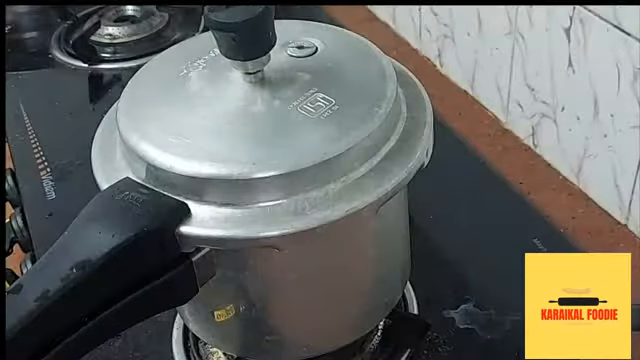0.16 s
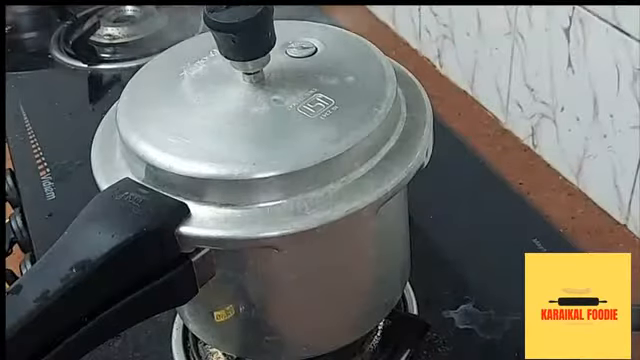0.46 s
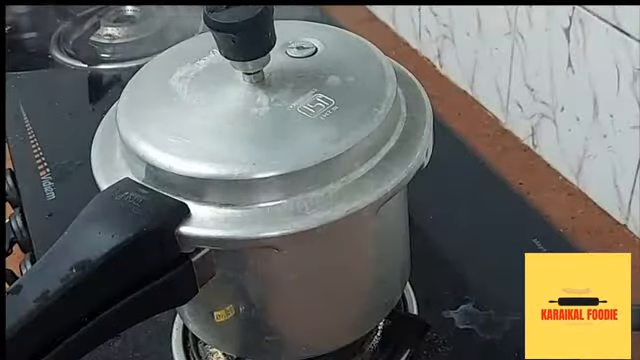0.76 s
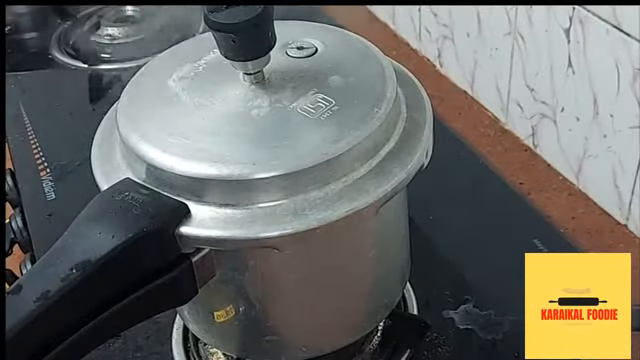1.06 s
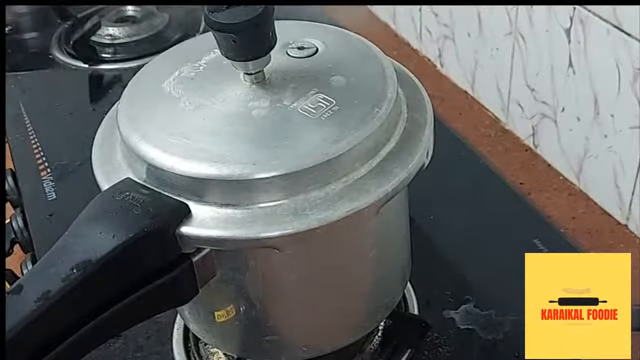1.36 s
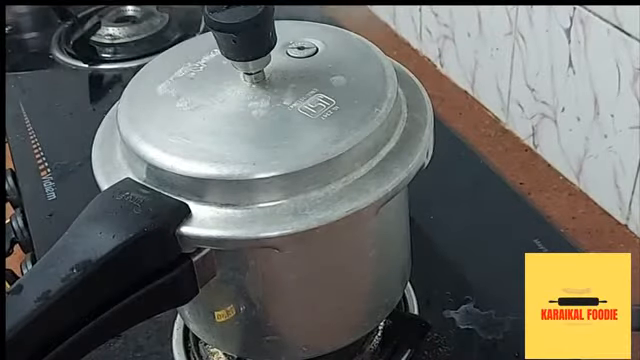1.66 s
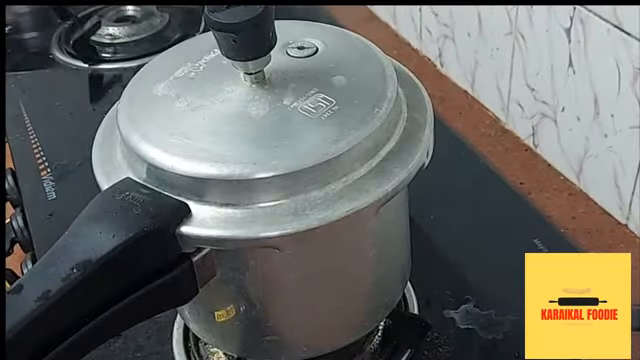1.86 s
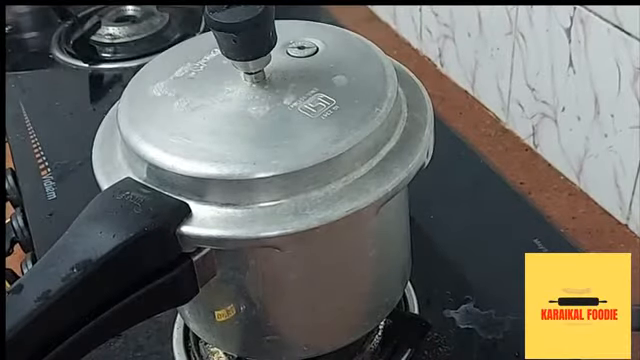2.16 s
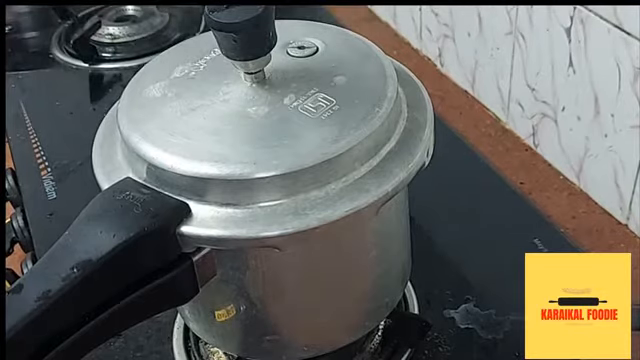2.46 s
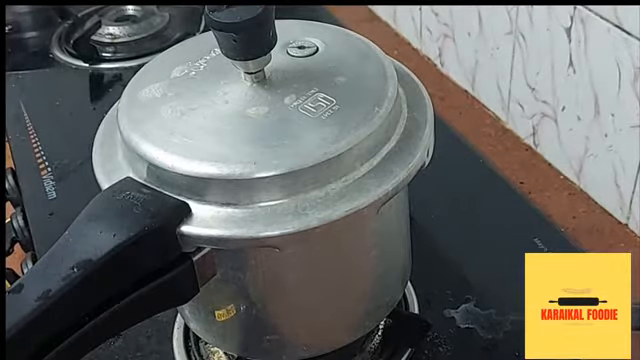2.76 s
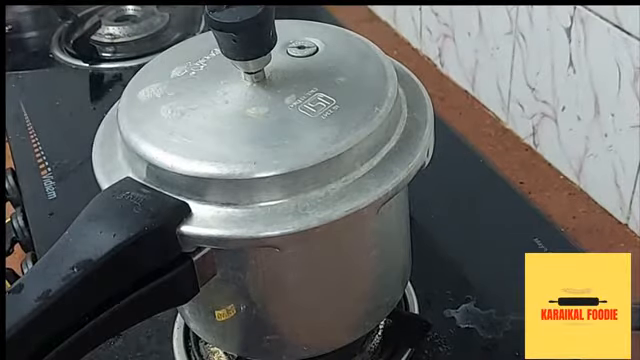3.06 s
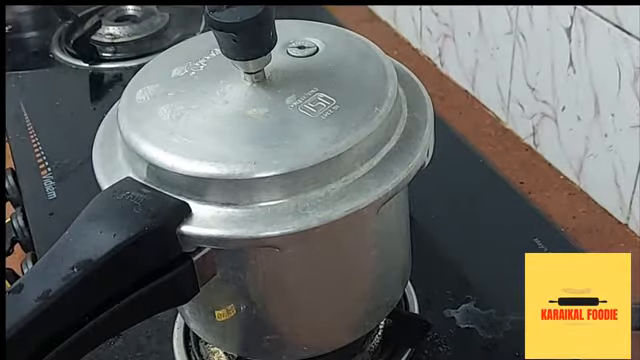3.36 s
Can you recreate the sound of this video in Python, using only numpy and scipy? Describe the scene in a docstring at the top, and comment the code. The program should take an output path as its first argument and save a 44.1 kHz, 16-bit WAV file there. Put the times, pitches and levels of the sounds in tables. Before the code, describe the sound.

A pressure cooker vents steam: a faint hum, a sudden burst within 0.2 seconds, then a loud continuous hiss to the end, with early rumbling thumps on the right, recorded close in a tiled kitchen.

```python
"""A faint appliance hum, from summed sines, fades in the first 0.2 s as steam bursts from a pressure cooker.
Three turbulent jets hiss through the resonant cavity under the weight, in a tiled kitchen, to the end.
Their draught buffets two microphone ports with a lumpy rumble and random pressure steps;
between 0.22 and 0.82 s sharp pressure jumps strike the right port alone.
Filtered impulses make a patter of droplets that weakens by 2 s, and a few larger spits from 1 s on."""
import sys
import numpy as np
from scipy import signal
from scipy.fft import rfft, irfft
from scipy.io import wavfile
from scipy.ndimage import uniform_filter1d

SR = 44100
rng = np.random.default_rng(int(sys.argv[2]) if len(sys.argv) > 2 else 0)


def pcm_store(signal):
    """Save signal as 16-bit PCM."""
    levels = np.round(np.clip(np.atleast_2d(signal), -1, 1) * 32767)
    wavfile.write(sys.argv[1], SR, levels.astype(np.int16).T)


N = 154350
T = np.arange(N) / SR

# Course of the steam. Each row: time in seconds, hiss level in dB, extra level of the low mids in dB,
# extra level of the treble in dB.
STEAM_COURSE = [(0, -38, 8, -19), (0.026, -40.5, 10, 0), (.031, -36, 12, -15), (.05, -24, -3, -13),
                (.068, -32.5, 13, 2), (.082, -24.5, 17, -7), (.13, -16, 8.5, -4.5), (.17, -14, 9, -2),
                (.2, -13, -10, -11.5), (0.262, -18.5, 3, -1), (.46, -20, -1.5, -2), (.54, -18.5, 0, -4),
                (.92, -18.5, -4.5, -3), (.935, -21.5, -1.5, -4), (1.15, -21.5, 0, -3.5),
                (1.66, -22.5, -2, -3), (1.85, -23.5, 0, -3), (2.22, -21, -1, -2.5), (2.5, -20, -3, -4.5),
                (2.8, -21, -0.5, -2.5), (3.3, -20, -1.5, -3), (3.5, -20, -3.5, -6.5)]
COURSE_S, HISS_DB, LOW_MID_DB, TREBLE_DB = np.transpose(STEAM_COURSE)


def gain_of(db):
    """Amplitude ratio from decibels: 20 dB is a factor of ten."""
    return 10 ** (np.asarray(db) / 20)


def evened(x):
    """Normalises to unit root-mean-square over all channels together."""
    return x / np.sqrt(np.mean(x ** 2) + 1e-20)


def read_spectrum(points, hz):
    """Interpolates a dB spectrum linearly over logarithmic frequency."""
    f, db = np.transpose(points)
    return np.interp(np.log(hz + 1), np.log(f + 1), db)


def filtered(x, hz, kind, order=2):
    """Butterworth filter: a maximally flat passband."""
    return signal.sosfilt(signal.butter(order, hz, kind, fs=SR, output="sos"), x)


def coloured(x, db):
    """Zero-phase filter: multiplies the Fourier spectrum by a gain in dB given as a function of Hz."""
    hz = np.fft.rfftfreq(x.shape[-1], 1 / SR)
    return irfft(rfft(x) * gain_of(db(hz)), x.shape[-1])


def random_impulses(per_s, spread_db, most):
    """Poisson impulses of random sign; their dB sizes are exponential, capped at `most` spreads."""
    size = gain_of(spread_db * np.minimum(rng.exponential(1, (2, N)), most))
    sign = rng.choice([-1., 1.], (2, N))
    return size * sign * (rng.random((2, N)) < per_s / SR)


def background():
    """Steady tones of an appliance superposed on shaped room noise, both under one fade."""
    # Appliance tones. Each row: frequency in Hz, RMS level in dB.
    tones = [(113.0, -46), (199.2, -39.5)]
    # Room noise spectrum. Each row: frequency in Hz, relative level in dB.
    room_spectrum = [(30, -10), (60, 0), (200, 13), (400, -16), (1700, -32), (7800, -30), (15700, -40)]
    hum = sum(np.sqrt(2) * gain_of(db) * np.sin(2 * np.pi * (hz * T + rng.random())) for hz, db in tones)
    noise = coloured(rng.standard_normal((2, N)), lambda hz: read_spectrum(room_spectrum, hz))
    fade = gain_of(np.interp(T, [.11, .17], [0, -20]))  # seconds, dB
    return fade * (hum + gain_of(-46) * evened(noise))


def droplet_tick(x):
    """A droplet as a band-limited impulse: its short pressure pulse loses both treble and bass."""
    return filtered(filtered(x, 1365, "low"), 343.2, "high", order=3)


def spatter():
    """Shot noise: many random ticks merge into a patter under the hiss; larger ones stand alone."""
    # Large spits at the right port. Each row: time in seconds, peak level in dB.
    spits = [(.983, -20), (1.1, -21.5), (1.15, -29), (1.335, -18), (1.45, -18), (1.49, -22.5), (1.54, -23),
             (1.5724, -15), (1.632, -21.5), (1.69, -27), (2.298, -32), (2.803, -17)]
    patter = evened(droplet_tick(random_impulses(per_s=400, spread_db=3.5, most=5)))
    drying_db = np.interp(T, [1.7, 2.0], [0, -9])
    port_db = [[-6], [0]]  # left, right
    patter_db = np.interp(T, COURSE_S, HISS_DB) - 18.5 + drying_db + port_db

    big = np.zeros((2, N))
    for at, db in spits:
        big[1, round(at * SR)] = gain_of(db)
    tick_peak = droplet_tick(np.eye(1, 400)[0]).max()
    return patter * gain_of(patter_db) + droplet_tick(big) / tick_peak


def port_cut(x):
    """The port's steep bass cut: a sustained pressure step decays back to zero."""
    return filtered(x, 58, "high", order=4)


def pressure_jumps():
    """Integrated impulses form pressure steps, smoothed in the treble and cut in the bass."""
    # Jumps at the right port. Each row: time in seconds, step size in dB before filtering, direction.
    jumps = [(0.2247, -12.5, -1), (0.2303, -18, 1), (0.2673, -6.5, -1), (0.275, 0, 1), (0.2787, -27, -1),
             (0.2828, -12, 1), (0.2906, -10, 1), (0.32, -12, -1), (0.3234, -2.5, 1), (0.3264, -7.5, 1),
             (0.3533, -7, -1), (0.3911, 1.5, 1), (0.4235, -6.5, 1), (0.4549, -4.5, -1), (0.4567, 2, 1),
             (0.5118, -7, -1), (0.5259, -8, 1), (0.5344, -16, 1), (0.5795, -9, -1), (0.5805, -1, 1),
             (0.5976, -10.5, 1), (0.6042, -6.5, -1), (0.616, -4.5, 1), (0.6298, -7.5, 1),
             (0.6387, -6.5, -1), (0.656, -9, 1), (0.731, -22, -1), (0.7412, -10, 1), (0.7452, -13, -1),
             (0.7496, -7, -1), (0.7635, -3, 1), (0.7855, -12.5, -1), (0.8159, -4, 1)]
    kicks = np.zeros(N)
    for at, db, direction in jumps:
        kicks[round(at * SR)] += np.sign(direction) * gain_of(db)
    return port_cut(filtered(np.cumsum(kicks), 2930, "low"))


def draught():
    """Turbulent pressure, uncorrelated between ports: low-passed noise plus a random walk of eddy steps."""
    # Draught on the ports. Each row: time in seconds, left level in dB, right level in dB.
    buffeting = [(.14, -34, -58), (.17, -33, -50), (.205, -22, -43), (.215, -28, -22), (.26, -34, -17),
                 (.36, -31, -28.5), (.44, -32, -28.5), (.53, -32, -24), (.61, -35, -22.5), (.7, -35, -27),
                 (.77, -30, -33), (.84, -28, -23), (.86, -31, -51), (.92, -33, -23.5), (1.03, -38.5, -68),
                 (1.11, -31, -37), (1.2, -37.5, -40), (1.27, -36.5, -61), (1.52, -33, -52),
                 (1.62, -35.5, -42), (1.7, -44.5, -65), (1.77, -32, -58), (1.82, -50, -60),
                 (1.88, -38, -44), (1.97, -61, -45), (2.02, -44.5, -39), (2.1, -53, -44), (2.17, -42, -44),
                 (2.24, -68, -47), (2.33, -32, -36.5), (2.41, -55, -54), (2.46, -42, -43), (2.52, -72, -50),
                 (2.77, -70, -47), (2.81, -82, -35), (2.87, -56, -47), (3.12, -84, -43), (3.16, -50, -43),
                 (3.25, -48, -47.5), (3.32, -76, -39), (3.36, -55, -49), (3.4, -30, -41), (3.45, -80, -47)]
    EDDY_SOFT_HZ = (420, 2000)  # low-pass corner at left, right port
    s, left, right = np.transpose(buffeting)
    level = gain_of([np.interp(T, s, db, left=-80) for db in (left, right)])

    slow = evened(filtered(rng.standard_normal((2, N)), 25, "low"))
    lumps = gain_of(1.5 * slow)
    rumble = port_cut(filtered(rng.standard_normal((2, N)) * lumps, 106, "low", order=4))

    kicks = lumps * random_impulses(per_s=220, spread_db=3.5, most=4)
    eddies = port_cut(np.cumsum(kicks, axis=1))
    eddies = np.array([evened(filtered(e, hz, "low")) for e, hz in zip(eddies, EDDY_SOFT_HZ)])

    turbulence = evened(eddies + gain_of(-4.5) * evened(rumble))  # rumble in dB relative to eddies
    return level * turbulence + [np.zeros(N), pressure_jumps()]


def vent_power(hz):
    """Power spectrum of a jet in a cavity: broadband turbulence plus resonances, with narrow dips."""
    # Broad jet noise. Each row: frequency in Hz, relative spectral density in dB per Hz.
    broad = [(60, -56), (200, -22.5), (310, -16), (600, -16), (1100, -19), (1700, -16), (2100, -15.5),
             (2400, -7.5), (4100, -11.5), (5500, -11.5), (6300, -10.5), (8800, -9), (11000, -4.5),
             (14000, -2.5), (15600, -11)]
    # Vent cavity resonances. Each row: frequency in Hz, width 6 dB below the peak in Hz, peak in dB.
    cavity = [(2204, 120, -7.5), (2540, 130, -13), (3130, 230, -2), (3330, 150, -2.5), (3700, 560, -5),
              (7220, 530, -4), (7710, 590, -3.5), (7920, 970, -6.5)]
    # Dips in the hiss. Each row: frequency in Hz, width at half the dB depth in Hz, depth in dB.
    notches = [(3940, 50, -4), (5810, 53, -9.5), (6320, 140, -8), (8900, 230, -2)]
    power = gain_of(2 * read_spectrum(broad, hz))  # twice the dB gives a power ratio
    power += sum(gain_of(2 * db) / (1 + (2 * (hz - f) / w) ** 2) ** 2 for f, w, db in cavity)
    dips_db = sum(db / (1 + (2 * (hz - f) / w) ** 2) for f, w, db in notches)
    return power * gain_of(2 * dips_db)


def jets():
    """Short-time spectral synthesis: independent noise per jet under one shared modulation of turbulence."""
    JETS, WINDOW, HOP = 3, 512, 128  # count, samples, samples
    SWELL_DB, FLICKER_DB, PATCH_DB = .5, 1.5, 2  # RMS depths
    frames, hz = N // HOP + 5, np.fft.rfftfreq(WINDOW, 1 / SR)
    t = np.arange(frames) * HOP / SR

    swell = evened(sum(np.sin(2 * np.pi * (f * t + rng.random())) / np.sqrt(f)
                       for f in np.geomspace(4, 40, 24)))
    flicker = uniform_filter1d(rng.standard_normal(frames), size=4)
    flicker = evened(flicker - uniform_filter1d(flicker, size=28))
    # Patches vary over both time and frequency.
    patches = uniform_filter1d(rng.standard_normal((frames, len(hz))), size=14, axis=0)
    patches = evened(uniform_filter1d(patches, size=4, axis=1))

    low_mid_band = 1 / (1 + (hz / 2610) ** 6) / (1 + (650 / (hz + 1)) ** 4)
    lid_ring = 0.43 / (1 + (2 * (hz - 930) / 300) ** 2)  # the lid rings while the low mids surge
    treble_band = 1 / (1 + (8700 / (hz + 1)) ** 4)
    db = PATCH_DB * patches + (SWELL_DB * swell + FLICKER_DB * flicker)[:, None]
    db += np.interp(t, COURSE_S, LOW_MID_DB)[:, None] * (low_mid_band + lid_ring)
    db += np.interp(t, COURSE_S, TREBLE_DB)[:, None] * treble_band

    noise = rng.standard_normal((JETS, frames, len(hz), 2)) @ [1, 1j]
    spectra = noise * np.sqrt(vent_power(hz)) * gain_of(db)
    hiss = signal.istft(spectra.transpose(0, 2, 1), nperseg=WINDOW, noverlap=WINDOW - HOP)[1][:, :N]
    return evened(hiss)


def kitchen(x):
    """Direct sound, delayed at the right port, plus an exponentially decaying diffuse field for each jet."""
    # Direct share of the sound. Each row: frequency in Hz, gain in dB.
    direct = [(300, -17), (1500, -19.5), (3000, -8), (5000, -3), (7500, 0.5), (10000, -10), (15000, -6)]
    T60_S, RISE_S, LAG_SAMPLES = 0.24, 0.0063, 6
    t = T[:SR // 2]
    envelope = gain_of(-60 * t / T60_S) * np.minimum(t / RISE_S, 1)
    tails = rng.standard_normal((2, len(x), len(t))) * envelope
    tails /= np.linalg.norm(tails, axis=2, keepdims=True)  # unit energy
    diffuse = signal.fftconvolve(x[None], tails, axes=2)[:, :, :N].sum(1)
    near = coloured(x.sum(0), lambda hz: read_spectrum(direct, hz))
    return diffuse + [near, np.roll(near, LAG_SAMPLES)]


def steam():
    """Complementary crossover: unrelated air noise at each port below 1360 Hz, the kitchen's field above."""
    def low_share(hz):
        return 1 / (1 + (hz / 1360) ** 4)

    hiss = jets()
    low = coloured(hiss[:2], lambda hz: 10 * np.log10(low_share(hz)) + 6)  # one jet for each port
    high = coloured(kitchen(hiss), lambda hz: 10 * np.log10(1 - low_share(hz) + 1e-9))
    return evened(low + high) * gain_of(np.interp(T, COURSE_S, HISS_DB))


def scene():
    """Linear superposition of the pressures at the two ports."""
    return background() + spatter() + draught() + steam()


def record(dry):
    """Saturation: a hyperbolic tangent bends large peaks softly towards full scale, then the band is limited."""
    overloaded = np.tanh(dry)
    band_limit = signal.firwin(1023, 15730, window=("kaiser", 10), fs=SR)
    return signal.oaconvolve(overloaded, band_limit[None], "same")


dry = scene()
out = record(dry)
pcm_store(out)
```